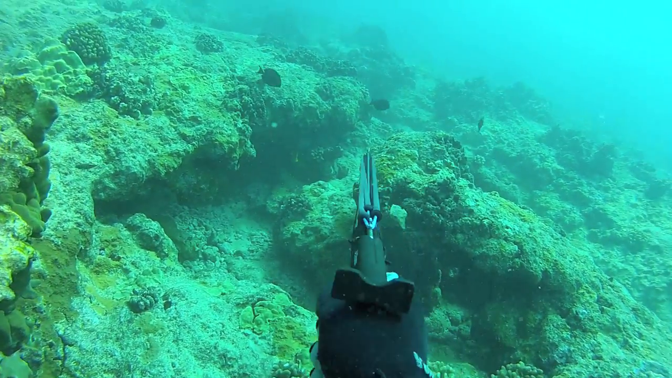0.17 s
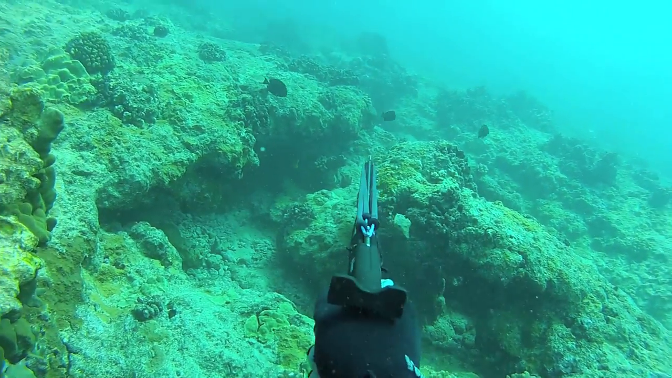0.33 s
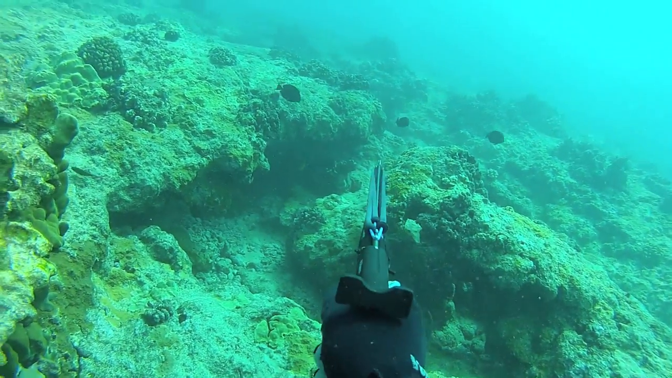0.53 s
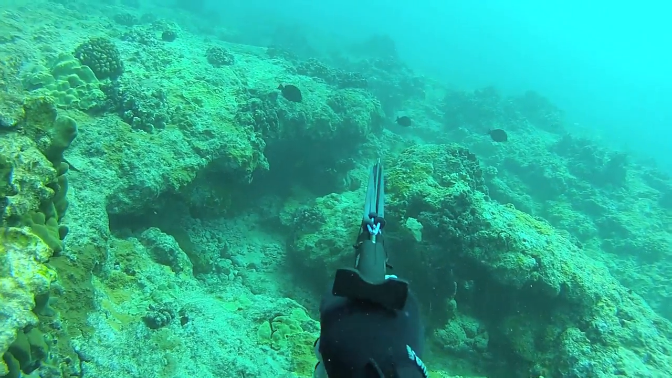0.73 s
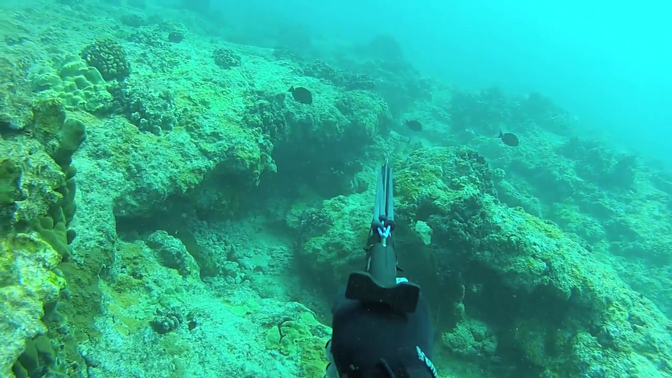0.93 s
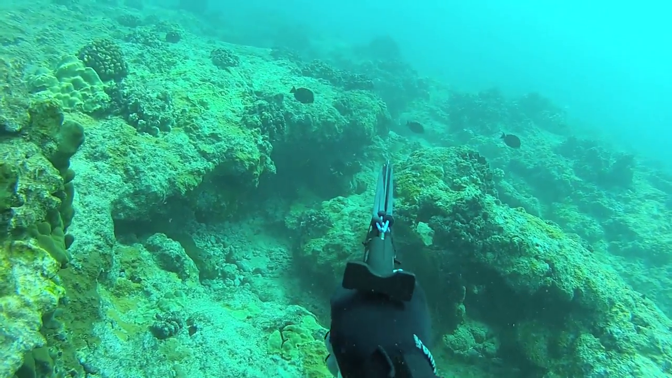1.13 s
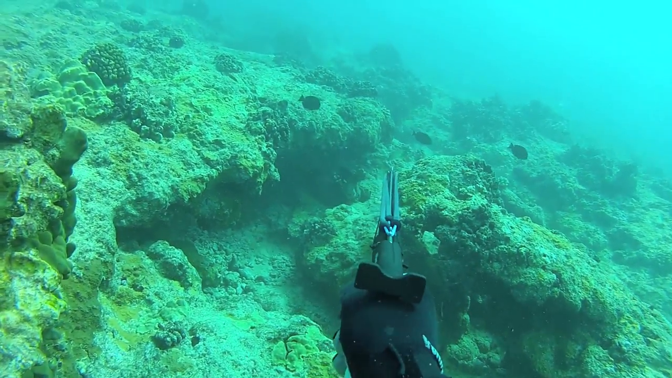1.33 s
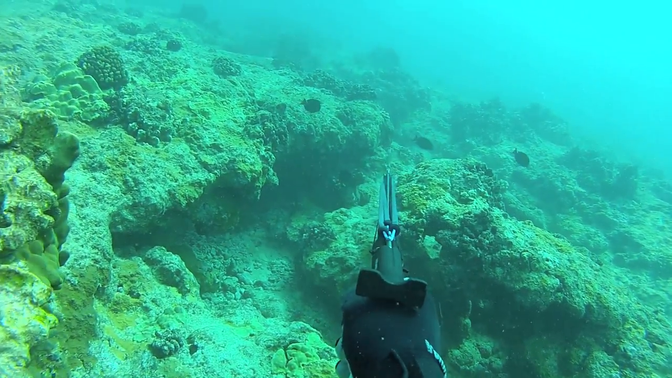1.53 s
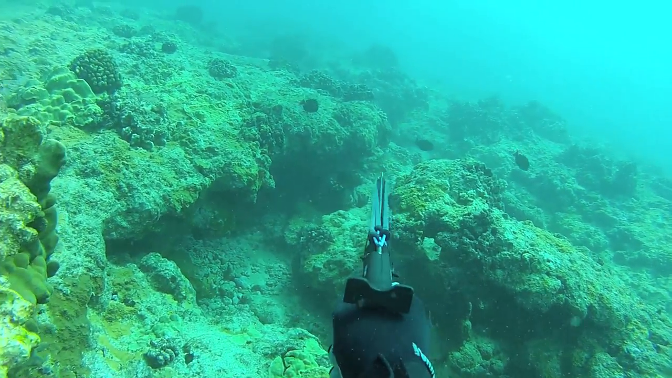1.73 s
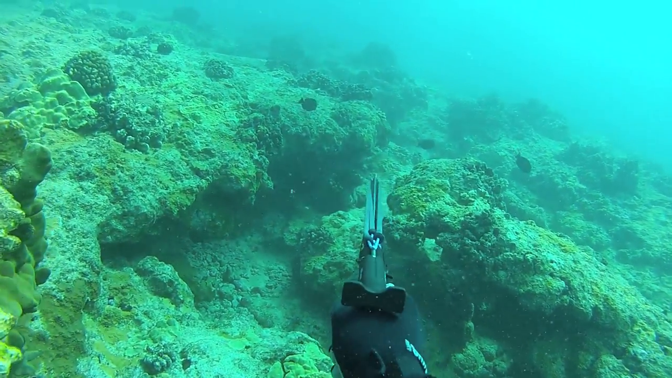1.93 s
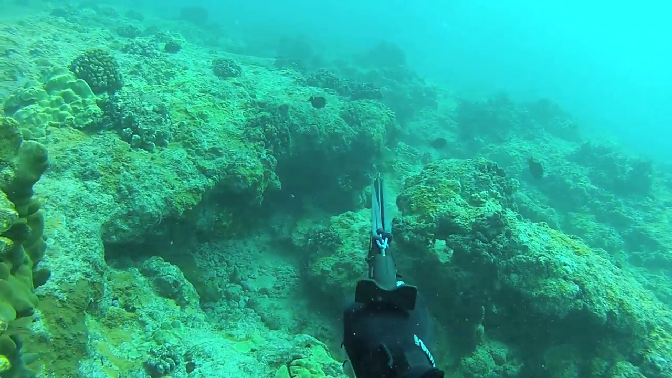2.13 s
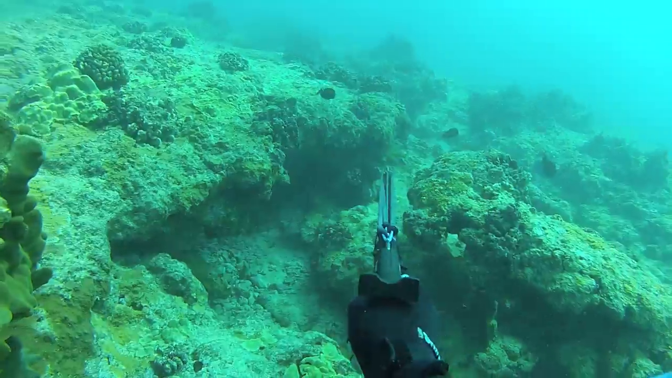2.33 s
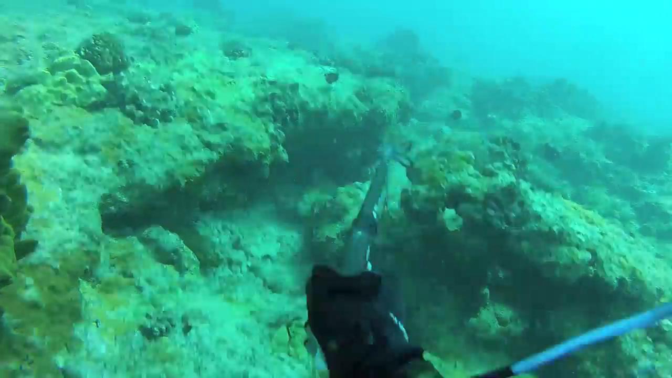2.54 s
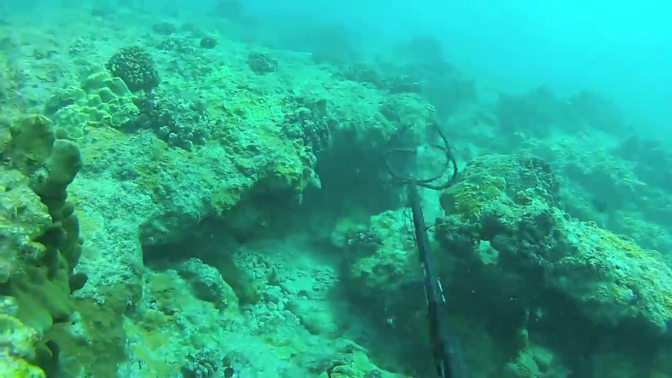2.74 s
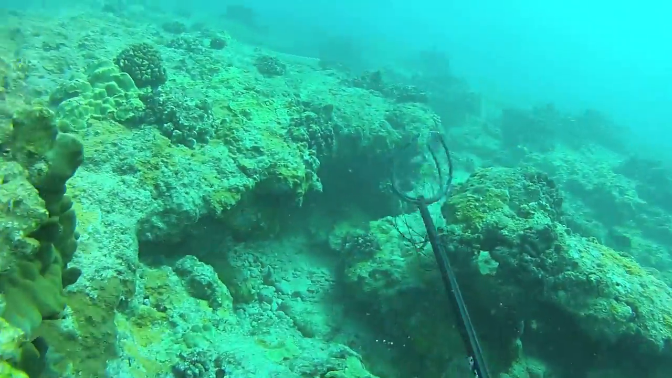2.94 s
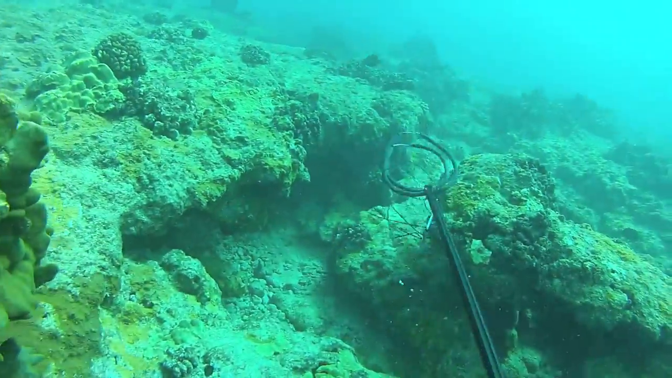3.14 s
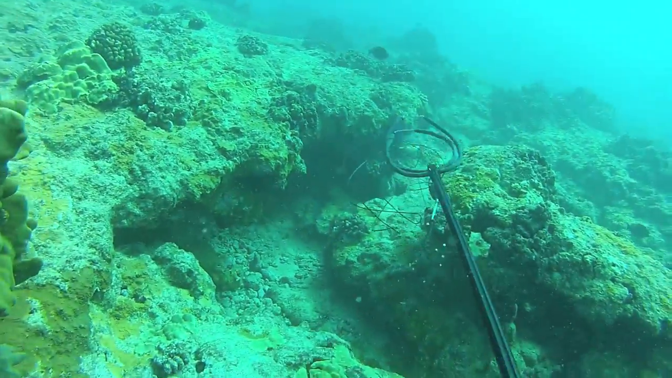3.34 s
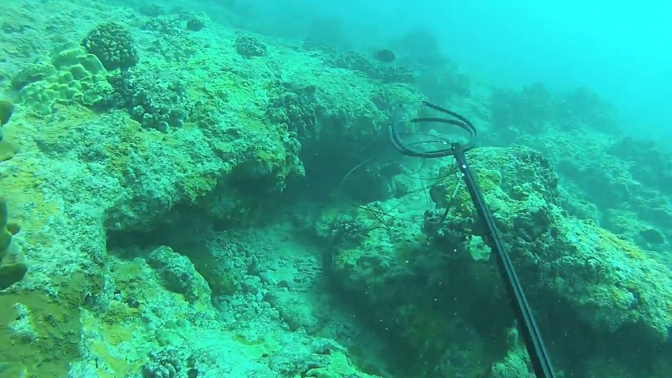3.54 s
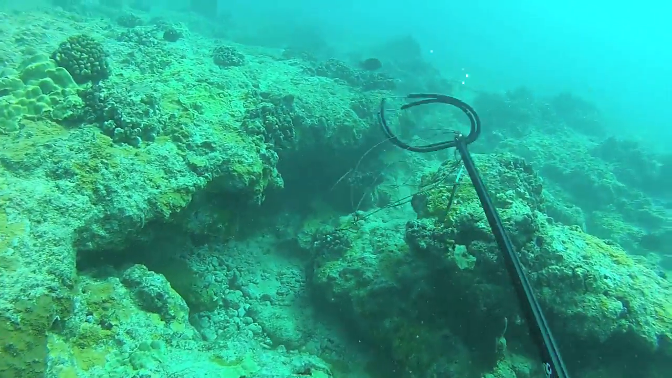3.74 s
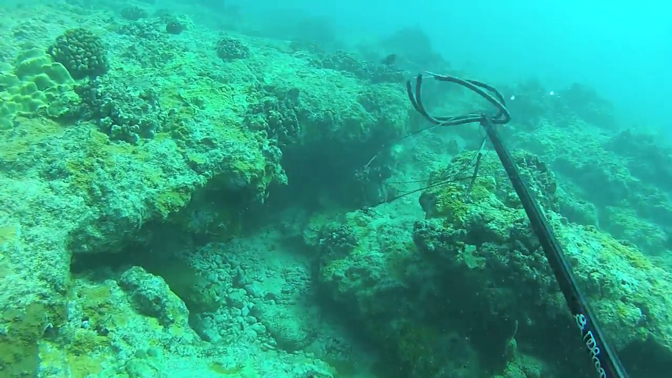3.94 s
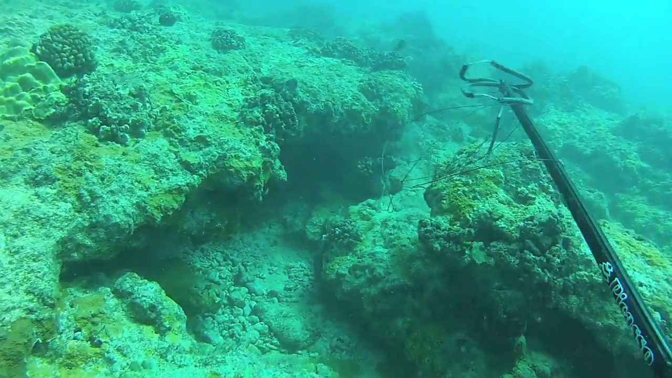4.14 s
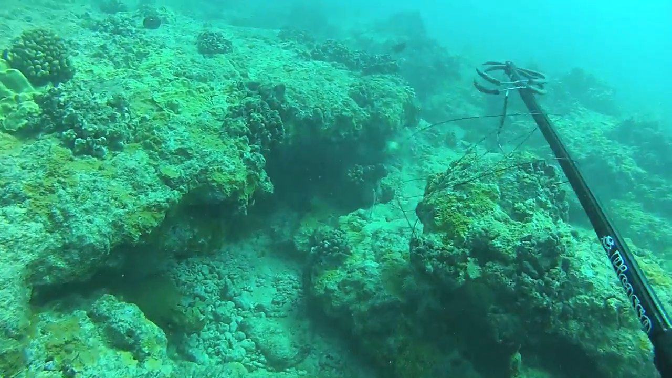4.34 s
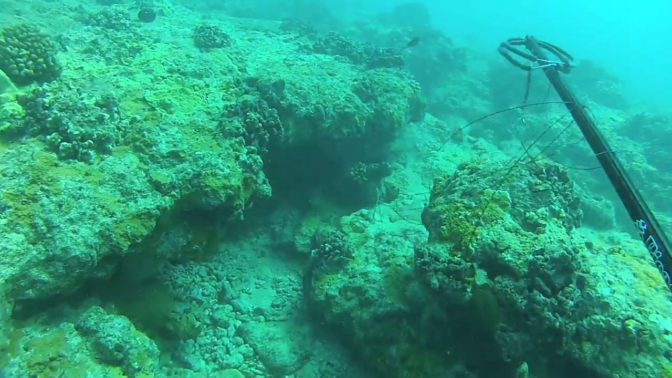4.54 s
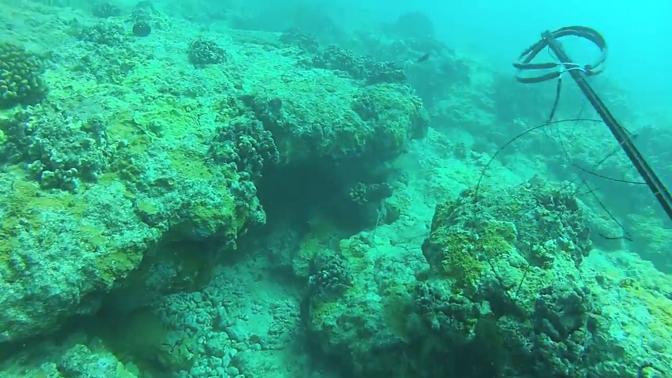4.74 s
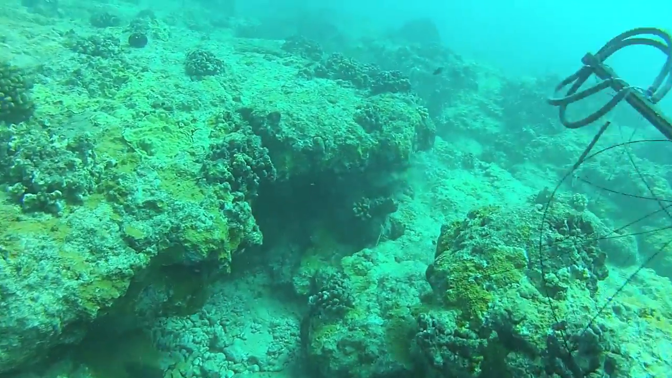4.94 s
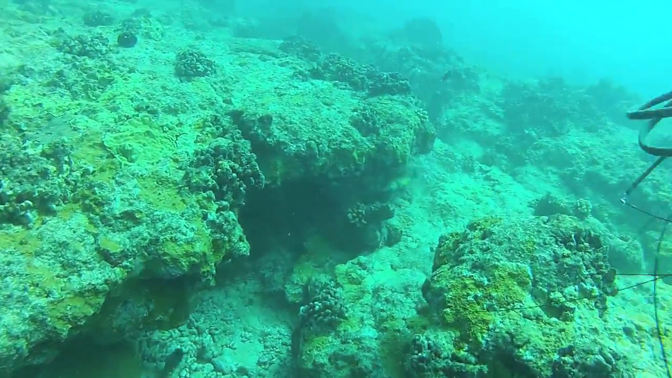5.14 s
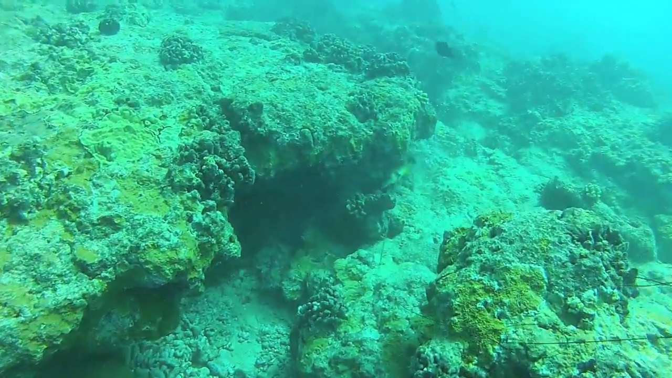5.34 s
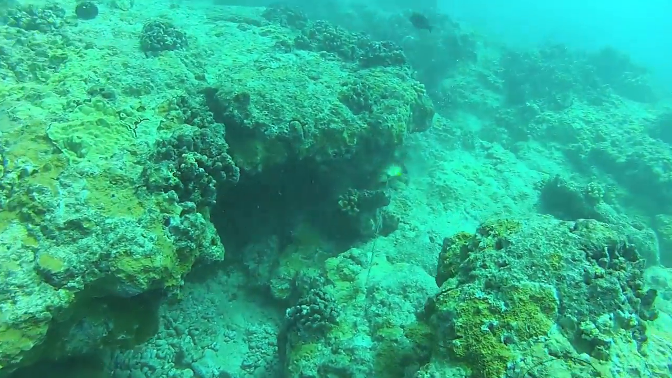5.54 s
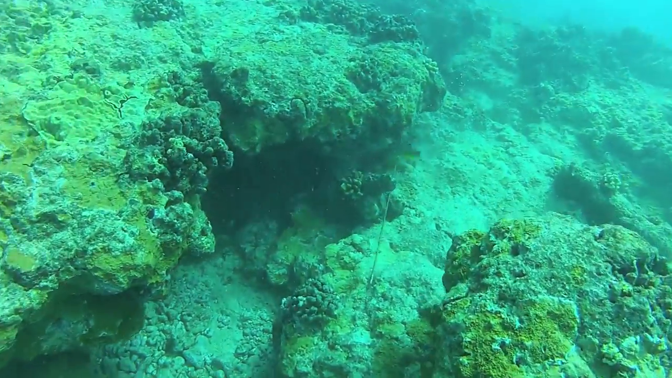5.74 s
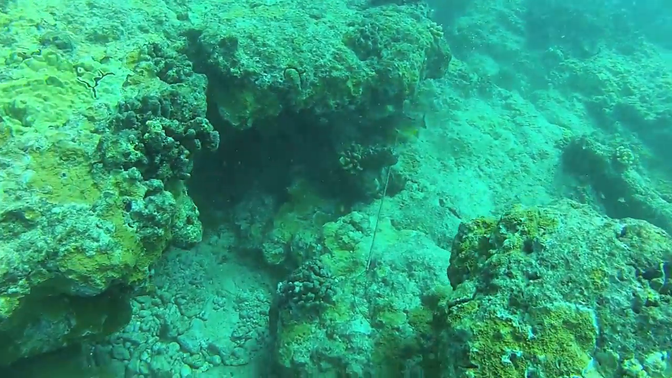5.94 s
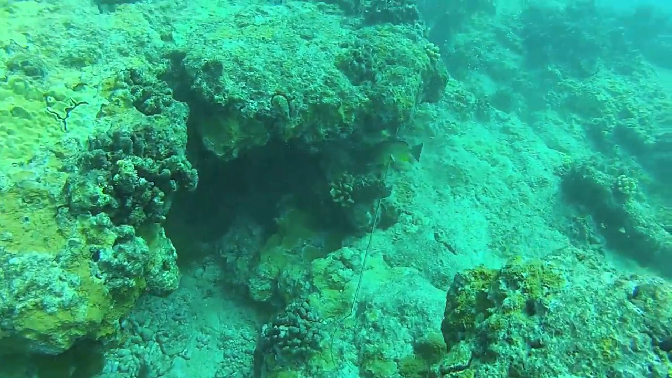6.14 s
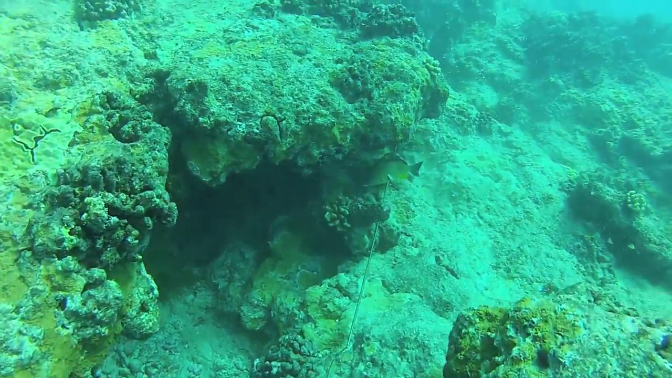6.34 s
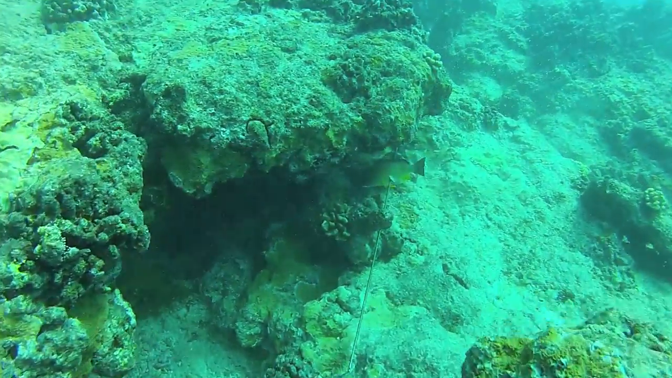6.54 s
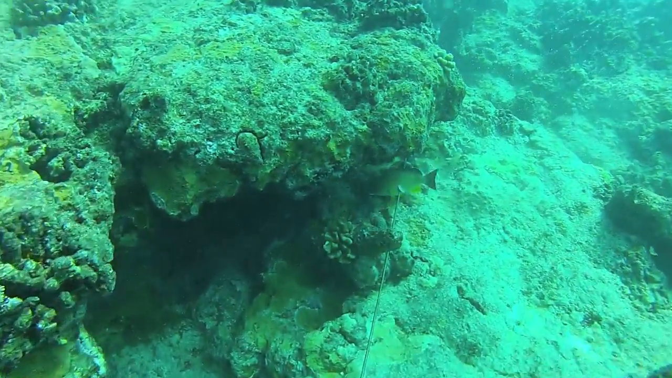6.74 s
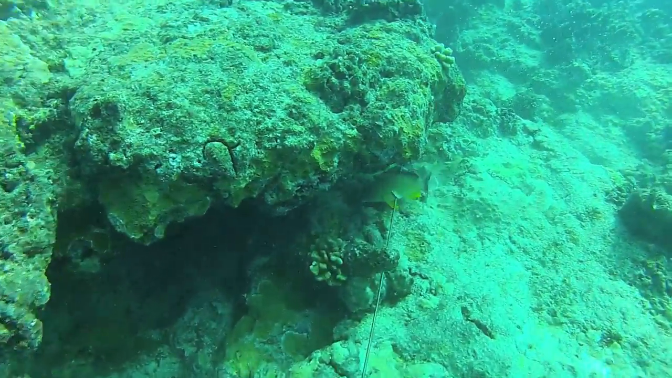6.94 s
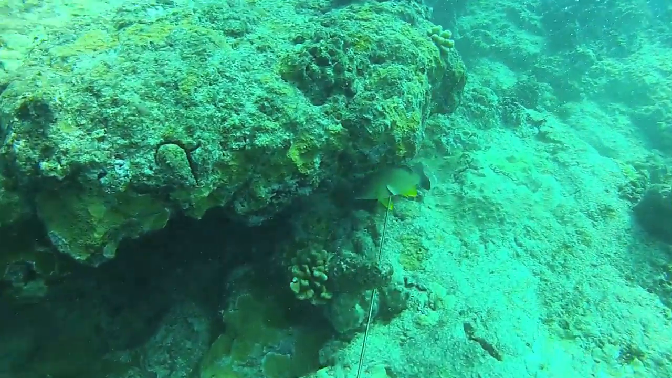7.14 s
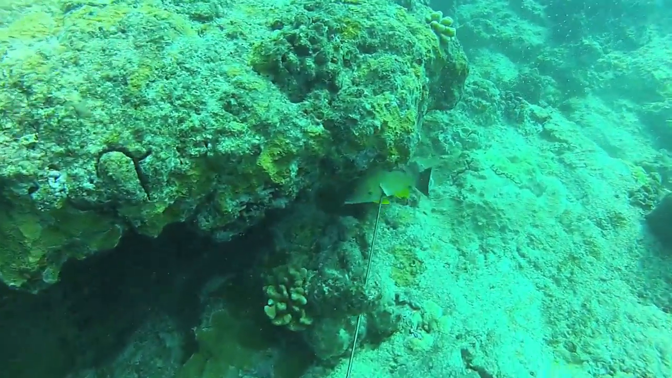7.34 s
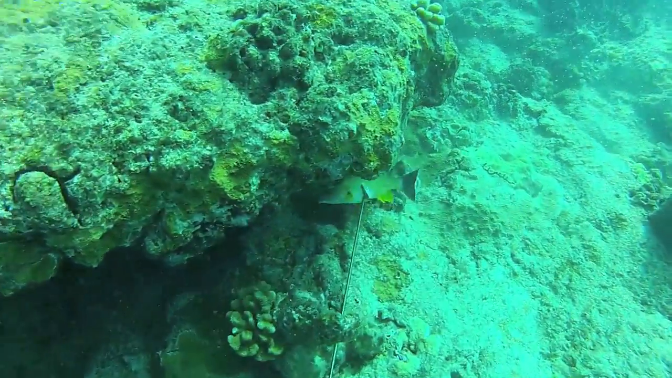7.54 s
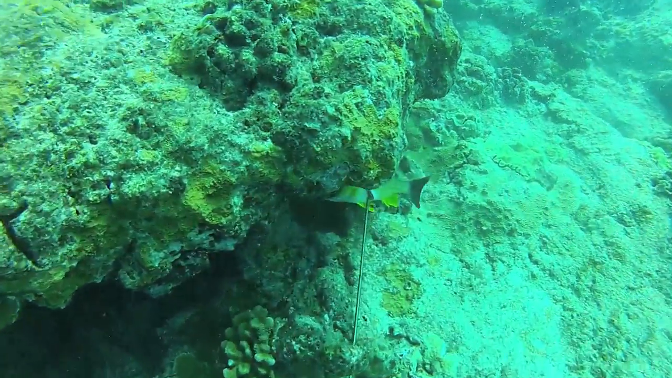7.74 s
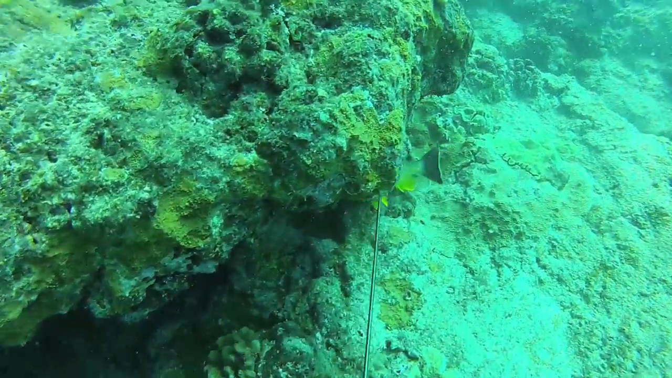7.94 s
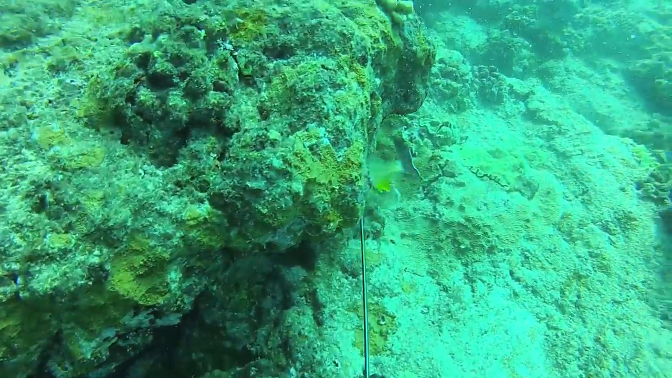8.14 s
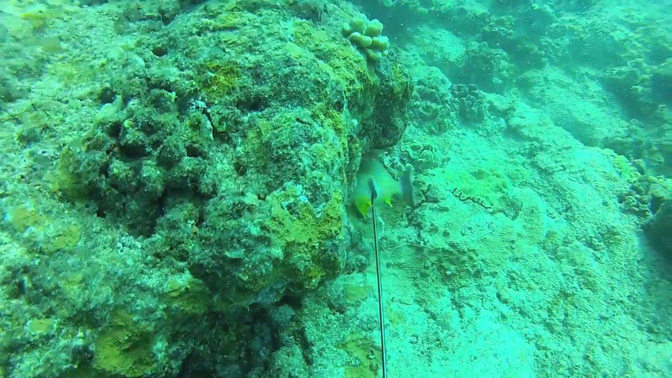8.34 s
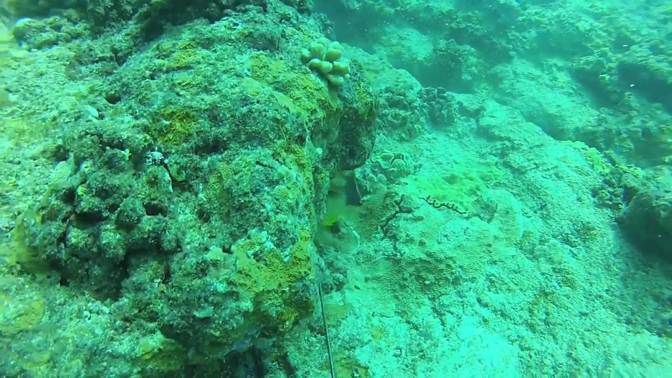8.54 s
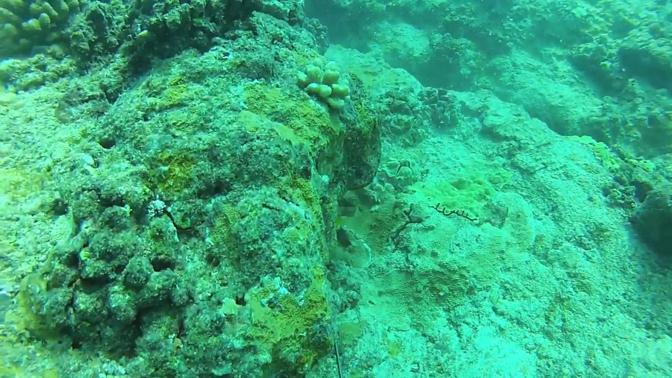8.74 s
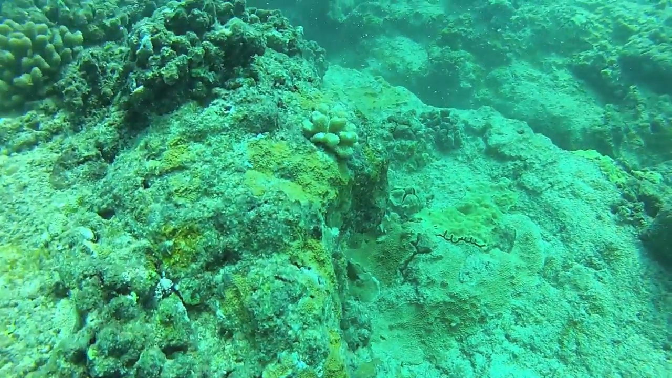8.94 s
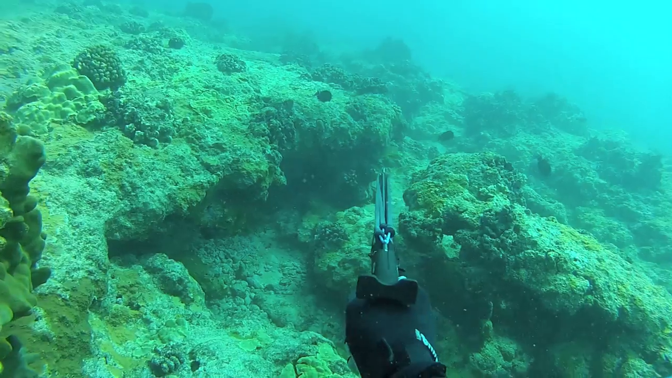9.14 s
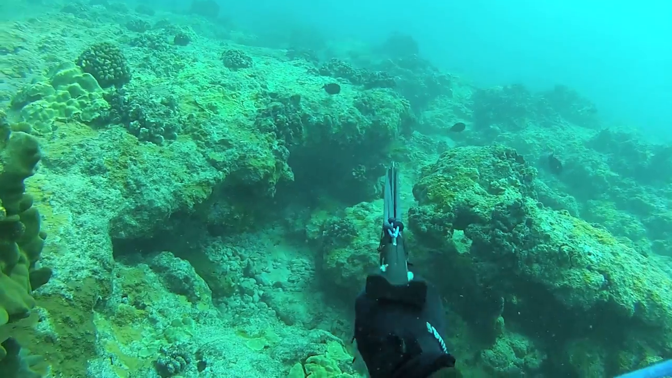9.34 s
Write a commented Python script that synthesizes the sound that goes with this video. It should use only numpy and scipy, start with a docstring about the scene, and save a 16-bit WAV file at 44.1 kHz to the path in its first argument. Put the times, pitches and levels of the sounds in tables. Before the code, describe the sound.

Close, muffled underwater sound over a reef. Shrimp snap softly against hiss and rumble while the diver waits. The speargun's sudden thump and crack overload the microphone slightly, its shaft scraping away amid a rapid clatter of dry, damped knocks. The diver then swims in strokes, with water surging round the housing, line rubbing, gurgles and gear bumping. The activity breaks off suddenly; after a brief lull the shot strikes again.

```python
"""Speargun shot over a reef

A band-powered speargun is fired, heard from inside a waterproof camera housing. The rubbers let go with a
thump, the shaft rasps along the barrel, then gun and line knock about as the diver swims on. Clicks and noise
drive short resonances for gun and bubbles; filtered noise gives water and hiss; shrimp snap and the camera
whines on sines. The gun and swimming sounds stop abruptly, and at the end the very same shot sounds once more."""
import sys
import numpy as np
from scipy import signal
from scipy.fft import rfft, irfft
from scipy.io import wavfile

SR = 44100
rng = np.random.default_rng(int(sys.argv[2]) if len(sys.argv) > 2 else 0)


def to_wav(sig):
    """Store sig (one row per channel, or 1-D mono) as 16-bit WAV at the path in sys.argv[1].

    Samples outside -1..1 are clipped; the rate is SR.
    """
    pcm = np.clip(np.atleast_2d(sig), -1, 1) * 32767
    pcm = np.round(pcm).astype(np.int16)
    wavfile.write(sys.argv[1], SR, pcm.T)  # frames by channels


N = 418068
TIME = np.arange(N) / SR

# All levels are those ahead of the camera's overload and filters in record().
# Deep rumble of the sea. Each row: frequency in Hz, density in dB per Hz (relative).
RUMBLE_SPECTRUM = [(15, -26), (28, 4.5), (60, -7), (200, -11), (500, -23)]
# Rumble growing as the diver gathers speed. Each row: time in seconds, level in dB.
RUMBLE_LEVEL = [(1.5, -60.5), (4, -58), (7.5, -52), (9, -54)]
# Electronic hiss of the camera. Each row: frequency in Hz, density in dB per Hz (relative).
HISS_SPECTRUM = [(200, 6.5), (500, 3), (1000, -4), (1580, -7.5), (1790, 12.5), (1980, 5), (2400, 1.5),
                 (2750, -1), (3300, 3.5), (3900, -4.5), (5300, -3.5), (8600, -8.5), (10200, -12.5),
                 (11500, -43), (13200, -40), (14000, -32.5), (15300, -15), (16000, -32.5)]
# Tones of the camera's whine. Each row: pitch in Hz, rms level in dB before the swell.
WHINE_TONES = [(1764, -74.5), (1839, -66), (2354, -78.5)]
# Swell of the whine. Each row: time in seconds, gain in dB.
WHINE_SWELL = [(0, 3.5), (1.15, 8), (2.3, -2), (5.5, -2), (6.5, 2), (9.48, -5.5)]
# Nearest snapping shrimp. Each row: time in seconds, peak level in dB.
NEAR_SNAPS = [(.2405, -30.5), (.594, -40), (1.11, -38), (1.233, -32), (1.475, -34.5), (2.196, -34),
              (3.761, -27.5), (8.288, -33.5)]
# Water booming round the housing. Each row: frequency in Hz, density in dB per Hz (relative).
FLOW_SPECTRUM = [(25, -5), (72, -4), (118, -8.5), (142, 3), (172, -9.5), (300, -17.5), (500, -23.5),
                 (900, -45.5)]
# Swimming strokes. Each row: middle in seconds, half length in seconds, water flow in dB,
# rubbing of line and glove in dB.
STROKES = [(3.854, 0.38, -59.5, -57.5), (4.35, 0.29, -52, -54), (4.957, 0.23, -55.5, -59.5),
           (5.446, 0.23, -46.5, -45.5), (6.305, 0.15, -53, -55.5), (6.95, 0.18, -49.5, -52),
           (7.742, .2, -46.5, -50.5), (8.298, 0.11, -53, -65.5), (8.9, 0.26, -49.5, -57.5)]
# Hard contacts on the gun. Each row: time in seconds, level in dB, pitch in Hz,
# brightness in dB against the core of the knock.
KNOCKS = [(.309, -57, 1100, -10), (.462, -55.5, 1000, -23), (.7983, -53, 1380, -8),
          (0.8791, -49.5, 1260, -18), (1.1556, -50.5, 1500, -25), (1.317, -56, 1100, -9),
          (1.873, -56, 1000, -18), (1.926, -42, 1320, -14), (2.597, -13.5, 1850, -7),
          (2.6577, -14, 1180, -15), (2.704, -28.5, 910, -25), (2.7512, -24.5, 2280, -7.5),
          (2.7562, -17, 2210, -4), (2.7943, -21.5, 2050, -0.5), (2.8247, -32.5, 1390, -0.5),
          (2.8369, -16, 2160, -11.5), (2.8812, -22, 1060, -18), (2.8884, -16, 1240, -4),
          (2.932, -22.5, 1660, -17), (2.94, -17, 1740, -5), (3.087, -40, 1090, -19),
          (3.1623, -33, 1250, -8.5), (3.1898, -39.5, 1590, -17), (3.2133, -41, 1010, -16),
          (3.259, -48, 1120, -8), (3.485, -44, 1173, -10.5), (3.6762, -28.5, 1490, -19),
          (3.9349, -37, 1840, -12.5), (4.0773, -41, 1100, -12.5), (4.1865, -41.5, 1080, -15),
          (4.949, -46, 890, -4), (5.3544, -18.5, 1310, -2), (5.411, -35.5, 1190, -11.5),
          (5.4943, -28, 1240, -14), (5.6645, -36, 1280, -16), (5.8023, -38.5, 1560, -9.5),
          (5.86, -41, 1110, -16), (5.9472, -40, 1120, -8.5), (6.152, -42, 1150, -12),
          (6.1862, -35.5, 1250, -17), (6.2928, -37, 1370, -11), (6.674, -28.5, 1100, -15),
          (6.727, -36, 1330, -9), (6.781, -40, 1660, -23), (6.968, -24.5, 1240, -15),
          (6.862, -47, 1100, -12), (7, -39, 1200, -14), (7.0826, -34.5, 1210, -30),
          (7.3282, -38.5, 1260, -16), (7.4375, -46.5, 1370, -7), (7.642, -33, 1400, -9),
          (7.735, -30, 1220, -11), (7.799, -39.5, 1000, -17), (7.8388, -30, 1180, -13.5),
          (7.8954, -20.5, 1470, -26), (7.9302, -25.5, 1140, -19.5), (8.0405, -49.5, 1170, -25),
          (8.329, -48.5, 1220, -18), (8.377, -48.5, 1160, -17), (8.684, -34, 1560, -15),
          (8.693, -27.5, 1600, -3.5), (8.7574, -32.5, 1530, -13), (8.7655, -26.5, 1240, -18),
          (8.814, -26, 1060, -24), (8.8648, -37, 1200, -19), (8.9115, -36.5, 1880, -10),
          (8.9334, -37, 1510, -7), (8.9481, -27, 1830, -17), (9.0153, -33.5, 1290, 0),
          (9.0236, -26.5, 1870, -12), (9.0488, -31, 1550, -24), (9.075, -29.5, 1740, -8),
          (9.0832, -25, 1720, -7), (9.1368, -27.5, 1710, -6.5)]
# The gun's short, water-damped resonances. Each row: pitch in Hz, strength in dB (both before the
# chance of where it is touched), time to fall 60 dB in seconds.
GUN_MODES = [(480, -11, 0.025), (706.5, -10.5, 0.032), (1139, -4, 0.017), (1310, -5.5, 0.013),
             (1560, 2, 0.0071), (1850, 2.5, 0.0097), (2230, 0, 0.0082), (2763, -6, 0.009),
             (3334, -6, 0.0038), (5180, -16.5, 0.007), (6570, -13.5, .003), (9030, -14.5, 0.0053)]
# Faint long ring of the steel shaft. Each row: pitch in Hz, strength in dB, time to fall 60 dB in seconds.
SHAFT_MODES = [(490, -35, .25), (753, -36.5, 0.35), (1045, -29, 0.38), (1740, -32.5, 0.24)]
# Soft pushes and bumps on the housing. Each row: start in seconds, level in dB, pitch in Hz.
THUMPS = [(0.957, -33.5, 135), (.957, -43, 373), (.988, -34, 140), (1.023, -41, 122), (1.974, -22.5, 126),
          (2.5266, -5.5, 127), (2.533, -15, 62), (2.603, -15, 335), (2.622, -21.5, 340),
          (2.685, -17.5, 51.3), (2.873, -27.5, 128), (3.774, -31.5, 127), (3.802, -34, 175),
          (4.605, -38, 126), (5.545, -24, 178), (6.932, -38, 155), (7.074, -23.5, 156), (7.663, -26.5, 140),
          (8.18, -30, 142), (8.18, -26.5, 316), (8.218, -33.5, 127), (8.897, -27, 132)]
# Gurgling bubbles, and throbs of the camera housing's hum near 140 Hz. Each row: middle in seconds, half length
# in # seconds, level in dB, pitch in Hz.
GURGLES = [(0.986, 0.027, -49.5, 380), (4.48, .05, -41, 142), (4.602, 0.018, -53, 790),
           (4.799, .13, -49, 140.5), (4.881, 0.019, -48, 780), (4.959, 0.028, -47.5, 790),
           (5.099, 0.019, -50.5, 720), (5.297, .025, -43, 2020), (5.41, 0.052, -47, 1740),
           (5.532, 0.013, -47, 2000), (7.572, 0.065, -52.5, 780), (8.2, .02, -47, 480),
           (8.479, 0.078, -47, 136)]
# Shaft, rubbers and line slide along the gun. Each row: start in seconds, length in seconds, level in dB.
SLIDES = [(2.533, 0.034, -15), (2.606, .028, -27), (2.665, 0.013, -19.5), (4.34, 0.037, -53.5),
          (6.673, 0.029, -36), (6.974, 0.0094, -39), (8.61, 0.015, -38.5), (9.023, .015, -37.5)]

# the shot, the abrupt stop of gun and swimming sounds, and the same shot once more (s)
SHOT_S, BREAK_S, REPEAT_S = 2.5265, 9.15, 9.3995
# slow surge of the rumble: depth and changes a second
SURGE_DB, SURGE_PER_S = 2.5, 6
HISS_DB = -62
# far shrimp: the level is that of the weakest snap
FAR_SNAPS_PER_S, FAR_SNAP_DB, FAR_SNAP_SPREAD_DB = 84, -57, 4.5
# water flow and rubbing while the diver lies still
REST_FLOW_DB, REST_RUB_DB = -69, -70
# water churned up by the shot
WAKE_FLOW_DB, WAKE_RUB_DB, WAKE_FALL_DB_PER_S = -33, -32, 31
# the line slips in bursts over a steady drag (share of a small burst)
SLIPS_PER_S, SLIP_S, SLIP_SPREAD_DB, STEADY_DRAG = 36, 0.0037, 4.0, 0.085
# line ticks and loose bubbles, relative to the rubbing
TICKS_DB, BUBBLES_DB = -2.5, -9
# a medium blow; harder knocks chatter for less time
MEDIUM_DB, MEDIUM_HZ = -35, 1350
CHATTER_S, CHATTER_HALVES_DB = 0.0043, 23.5
# weaker sounds round each knock, relative to the blow; the sound starts LEAD_IN_S before the blow
LEAD_IN_S, LEAD_IN_DB, BOUNCE_DB, DRAG_DB = .01, -25, -19.5, -34
# harder and higher knocks sound less hollow
HOLLOW_DB, HOLLOW_PER_DB, HOLLOW_PER_OCTAVE_DB = -8.5, -0.38, -5
# rise of a medium bump; harder ones are shorter
SWELL_CYCLES, SWELL_HALVES_DB = 0.83, 22.5
GURGLE_CYCLES = 32  # cycles for a gurgle's ring to fall 60 dB
# the trigger's crack, and the attack and release of each slide
CRACK_DB, CRACK_DECAY_S = -6, 0.0032
SLIDE_ATTACK_S, SLIDE_RELEASE_S = .012, 0.0089
CUTOFF_HZ = 15600


def from_db(db):
    """Decibels to amplitude."""
    return 10 ** (np.asarray(db) / 20)


def rms_one(x):
    """Scales a sound to rms 1."""
    return x / np.sqrt(np.mean(x ** 2) + 1e-20)


def gain_curve(rows):
    """A curve of times and dB as a gain at every sample."""
    s, db = np.transpose(rows)
    return from_db(np.interp(TIME, s, db))


def add(out, s, sound):
    """Mixes a sound in at a time in seconds."""
    at = min(round(s * SR), N)
    out[at:at + len(sound)] += sound[:N - at]


def band(x, low_hz, high_hz, order=2):
    """Keeps the band between two frequencies."""
    sos = signal.butter(order, [low_hz, min(high_hz, .45 * SR)], "band", fs=SR, output="sos")
    return signal.sosfilt(sos, x)


def ring(clicks, hz, t60):
    """A resonance: each unit click sets off a dying sine of height 1."""
    r = from_db(-60 / (t60 * SR))
    w = 2 * np.pi * hz / SR
    return signal.lfilter([0, np.sin(w)], [1, -2 * r * np.cos(w), r * r], clicks + 1e-18)


def drift(rate):
    """Smooth chance with spread 1, heading for a new value `rate` times a second."""
    knots = rng.standard_normal(4000)
    return rms_one(np.interp(TIME * rate, np.arange(len(knots)), knots))


def noise(spectrum):
    """Noise of a given colour, rms 1."""
    hz, db = np.transpose(spectrum)
    log_hz = np.log(np.fft.rfftfreq(N, 1 / SR) + 1)
    colour = np.interp(log_hz, np.log(hz), db, left=-90, right=-90)
    return rms_one(irfft(rfft(rng.standard_normal(N)) * from_db(colour), N))


def grains(per_s, spread_db, size=N):
    """Random clicks of either sign, of height 1 and up, the stronger the rarer."""
    born = rng.random(size) < per_s / SR
    sign = rng.choice([-1, 1], size)
    return born * sign * from_db(spread_db * np.minimum(rng.exponential(1, size), 4))


def gun_body(clicks, uneven_db, detune):
    """The gun's resonances in parallel; strength and pitch vary by chance with where it is touched."""
    chance = rng.standard_normal((len(GUN_MODES), 2))
    out = 0
    for k, ((hz, db, t60), (a, b)) in enumerate(zip(GUN_MODES, chance)):
        strength = (-1) ** k * from_db(db + uneven_db * a)
        out = out + strength * ring(clicks, hz * np.exp(detune * b), t60)
    return out


def sea_rumble():
    """Low noise of the sea, surging slowly and growing as the diver gathers speed."""
    surge = rms_one(from_db(SURGE_DB * drift(SURGE_PER_S)))
    return gain_curve(RUMBLE_LEVEL) * surge * noise(RUMBLE_SPECTRUM)


def camera():
    """Electronic hiss and a thin, slightly wavering whine of sines."""
    phase = 2 * np.pi * np.cumsum(1 + .0006 * drift(12)) / SR
    whine = sum(np.sqrt(2) * from_db(db) * np.sin(hz * phase) for hz, db in WHINE_TONES)
    return gain_curve(WHINE_SWELL) * whine + from_db(HISS_DB) * noise(HISS_SPECTRUM)


def shrimp():
    """Very short bright snaps, band-limited clicks: a few close by and many far off."""
    clicks = from_db(FAR_SNAP_DB) * grains(FAR_SNAPS_PER_S, FAR_SNAP_SPREAD_DB)
    for s, db in NEAR_SNAPS:
        add(clicks, s, from_db([db]))
    snap = band(signal.unit_impulse(128), 2200, 4500, order=1)
    return np.convolve(clicks, snap / np.abs(snap).max())[:N]


def movement():
    """Strength of water flow and of rubbing: rest, the shot's dying wake, and a smooth swell per stroke."""
    wake = (TIME > SHOT_S) * from_db(-WAKE_FALL_DB_PER_S * np.abs(TIME - SHOT_S))
    flow = from_db(REST_FLOW_DB) + from_db(WAKE_FLOW_DB) * wake
    rubbing = from_db(REST_RUB_DB) + from_db(WAKE_RUB_DB) * wake
    for s, half_s, flow_db, rub_db in STROKES:
        swell = np.exp(-np.minimum(np.abs(TIME - s) / half_s, 10) ** 2)
        flow = flow + from_db(flow_db) * swell
        rubbing = rubbing + from_db(rub_db) * swell
    return flow, rubbing


def line_ticks():
    """The line slips on the gun in short separate bursts over a faint steady drag."""
    starts = np.abs(grains(SLIPS_PER_S, SLIP_SPREAD_DB))
    bursts = signal.lfilter([1], [1, -np.exp(-1 / (SLIP_S * SR))], starts + 1e-18)
    slips = grains(3000, 1.6) * (bursts + STEADY_DRAG)
    return rms_one(band(gun_body(slips, uneven_db=3.5, detune=0), 380, 1900))


def loose_bubbles():
    """Small bubbles come in little swarms; each rings for two dozen cycles at the pitch of its size."""
    swarms_per_s = 5 * from_db(9 * drift(9))
    blips = 0
    for hz in np.geomspace(600, 2100, 16):
        blips = blips + ring(grains(swarms_per_s, 2.0), hz, 24 / hz) / np.sqrt(hz)
    return rms_one(blips)


def swimming():
    """Water booms lumpily round the housing; line and glove tick on the gun and shake bubbles loose."""
    flow, rubbing = movement()
    boom = noise(FLOW_SPECTRUM) * rms_one(from_db(3.3 * drift(14)))
    handling = from_db(TICKS_DB) * line_ticks() + from_db(BUBBLES_DB) * loose_bubbles()
    return flow * boom + rubbing * handling


def knock(force_db, pitch_hz, bright_db):
    """A faint noise leads in, then parts meet hard, chatter and bounce once, ringing part and gun body."""
    t = (np.arange(2646) - round(LEAD_IN_S * SR)) / SR  # 60 ms, the blow at zero
    chatter_s = CHATTER_S * 2 ** (-force_db / CHATTER_HALVES_DB)
    lead_in = from_db(LEAD_IN_DB) * np.exp(-np.abs(t + rng.uniform(.002, .007)) / .0012)
    pressure = np.exp(np.minimum(t / 0.00058, -t / chatter_s))
    bounce = from_db(BOUNCE_DB) * np.exp(-np.abs(t - rng.uniform(0.006, 0.013)) / 0.00082)
    drag = from_db(DRAG_DB) * np.exp(np.minimum(t / .004, -t / 0.013))
    blow = t == 0
    excitation = blow + .26 * grains(5000, 0.7, size=len(t)) * (lead_in + pressure + bounce + drag)

    body = rms_one(gun_body(excitation, uneven_db=3.5, detune=0.081))
    struck_part = rms_one(ring(excitation, pitch_hz, 0.01))
    tuning = np.sqrt(pitch_hz / MEDIUM_HZ)
    core = rms_one(band(body + 0.86 * struck_part, 920 * tuning, 2050 * tuning, order=3))
    octaves = np.log2(pitch_hz / MEDIUM_HZ)
    hollow_db = HOLLOW_DB + HOLLOW_PER_DB * force_db + HOLLOW_PER_OCTAVE_DB * octaves
    hollow = from_db(hollow_db) * rms_one(band(body, 213, 740, order=3))
    bright = from_db(bright_db) * rms_one(band(body, 2246, 14000, order=3))
    # the level is that of the core's energy packed into 10 ms
    return np.sqrt(SR / 100 / len(t)) * (core + hollow + bright)


def knocks():
    """Line, rubbers and shaft hit the gun; each blow leaves the shaft ringing faintly."""
    out, blows = np.zeros(N), np.zeros(N)
    for s, db, pitch_hz, bright_db in KNOCKS:
        add(out, s - LEAD_IN_S, from_db(db) * knock(db - MEDIUM_DB, pitch_hz, bright_db))
        add(blows, s, from_db([db]))
    shaft = sum(from_db(db) * ring(blows, hz, t60) for hz, db, t60 in SHAFT_MODES)
    return out + shaft


def thumps():
    """A soft push swells and dies within a few cycles, with a weaker overtone of the housing."""
    out, t = np.zeros(N), np.arange(SR // 6) / SR
    for s, db, hz in THUMPS:
        swell_s = SWELL_CYCLES / hz * 2 ** ((MEDIUM_DB - db) / SWELL_HALVES_DB)
        swell = t / swell_s * np.exp(1 - t / swell_s)
        overtone = from_db(-16) * np.sin(2 * np.pi * 2.28 * hz * t)
        add(out, s, from_db(db) * swell * (overtone - np.sin(2 * np.pi * hz * t)))
    return band(out, 22, 1500)


def gurgles():
    """Bubbles, and the housing's hum near 140 Hz, throb at their pitch, swelling and fading."""
    out = np.zeros(N)
    for s, half_s, db, hz in GURGLES:
        t = np.arange(-3 * half_s, 3 * half_s, 1 / SR)
        throb = rms_one(ring(rng.standard_normal(len(t)), hz, GURGLE_CYCLES / hz))
        add(out, s + t[0], from_db(db) * throb * np.exp(-(t / half_s) ** 2))
    return out


def rasp():
    """The trigger cracks; each slide is a dense run of tiny contacts that builds, holds and dies away."""
    level, release, t = np.zeros(N), np.zeros(N), np.arange(SR // 5) / SR
    add(level, SHOT_S, from_db(CRACK_DB) * np.exp(-t / CRACK_DECAY_S))
    for s, length_s, db in SLIDES:
        attack = np.minimum(t / SLIDE_ATTACK_S, 1)
        decay = np.exp(-np.maximum(t - length_s, 0) / SLIDE_RELEASE_S)
        add(level, s, from_db(db) * attack * decay)
    scrape = level * rms_one(gun_body(grains(5800, 3.1), uneven_db=1.5, detune=0))
    # one click at the shot rings the whole gun
    add(release, SHOT_S, from_db([-10]))
    return scrape + gun_body(release, uneven_db=3.5, detune=0)


def scene():
    """Gun and swimming sounds stop abruptly, then the very same shot sounds again; rumble, shrimp and camera go
    on throughout."""
    gun = knocks() + thumps() + rasp()
    action = (swimming() + gun + gurgles()) * (TIME < BREAK_S)
    add(action, REPEAT_S, gun[round(SHOT_S * SR):])
    return (sea_rumble() + camera() + shrimp() + action)[None]


def record(dry):
    """The camera overloads softly, dips at 6 kHz and mirrors the mids around 12 kHz as a glassy fizz."""
    x = 1.234 * np.tanh(dry / 1.178)
    carrier = np.cos(2 * np.pi * 12000 * TIME)
    mirror = from_db(-6.0) * band(x, 1640, 4200, order=1) * carrier
    notch = signal.iirnotch(6000, 4, fs=SR)
    # a little unnotched sound partly fills the dip
    x = signal.lfilter(*notch, x + mirror) + from_db(-17) * x
    return signal.sosfilt(signal.ellip(10, .2, 80, CUTOFF_HZ, fs=SR, output="sos"), x)


dry = scene()
out = record(dry)
to_wav(out)
```